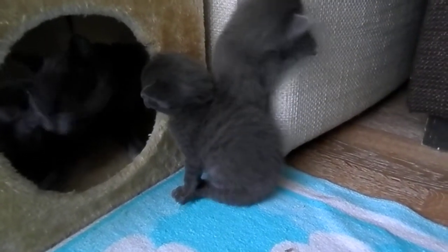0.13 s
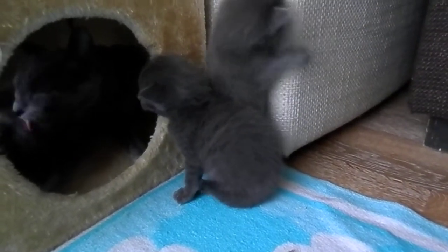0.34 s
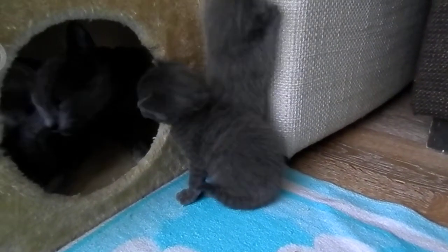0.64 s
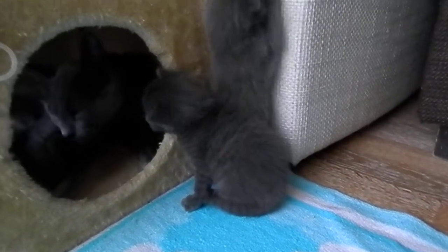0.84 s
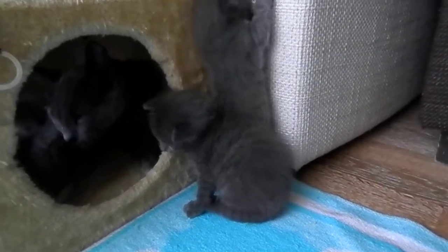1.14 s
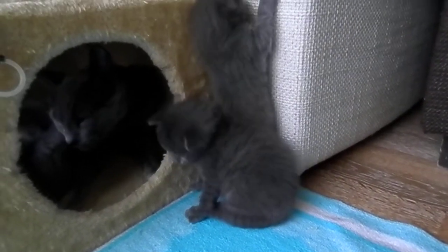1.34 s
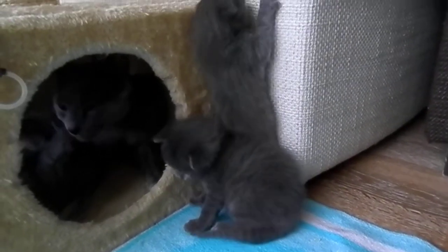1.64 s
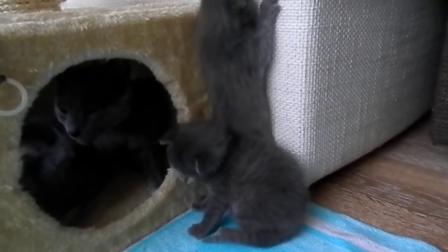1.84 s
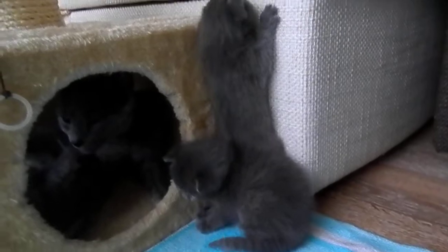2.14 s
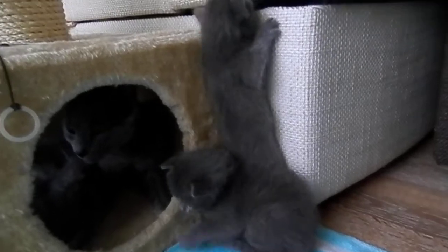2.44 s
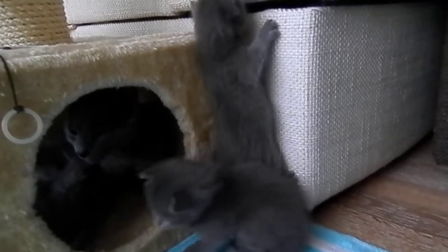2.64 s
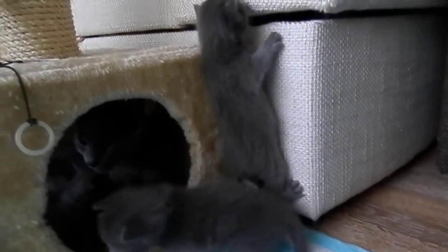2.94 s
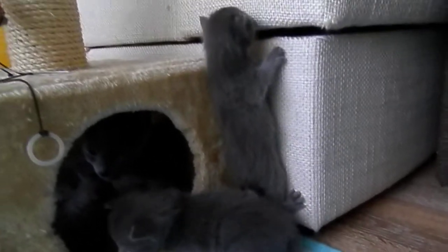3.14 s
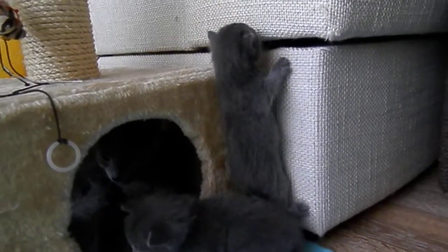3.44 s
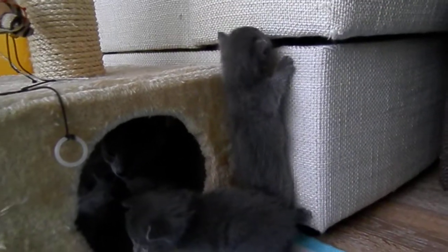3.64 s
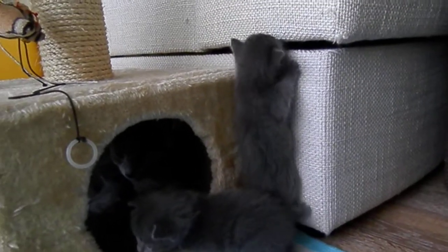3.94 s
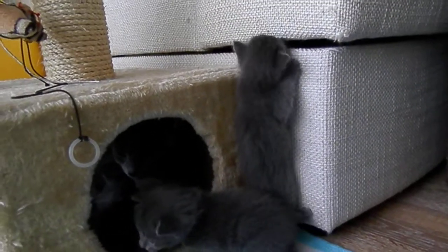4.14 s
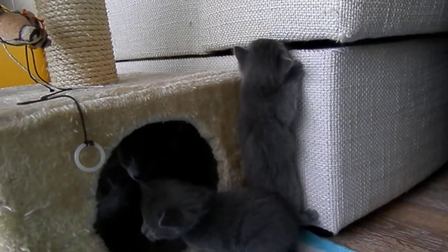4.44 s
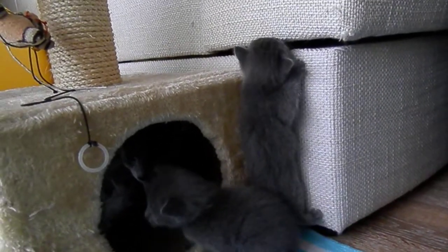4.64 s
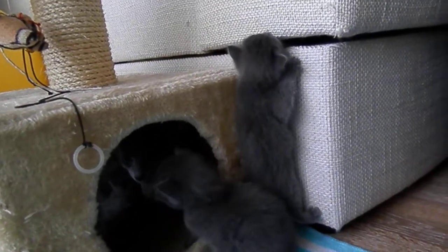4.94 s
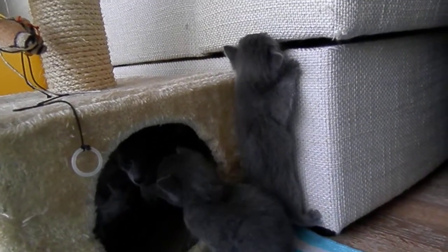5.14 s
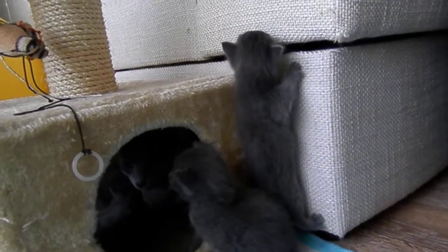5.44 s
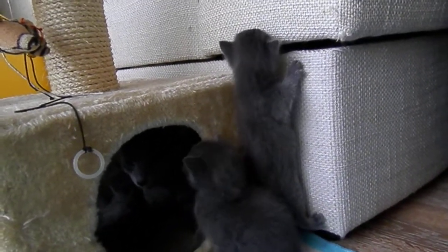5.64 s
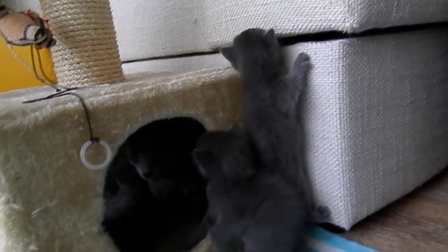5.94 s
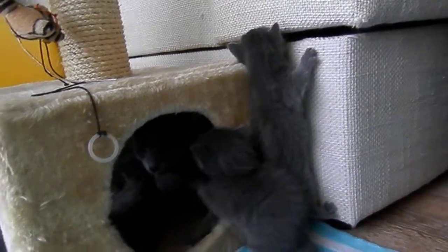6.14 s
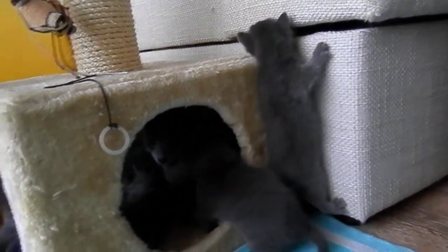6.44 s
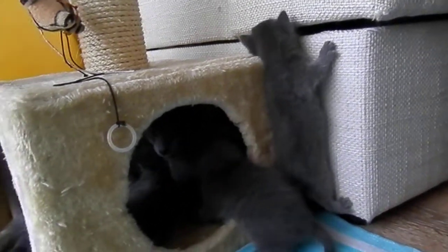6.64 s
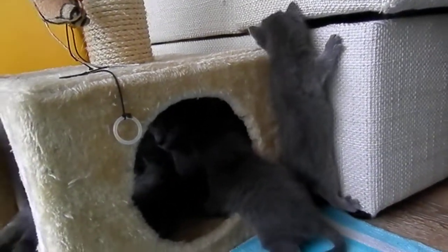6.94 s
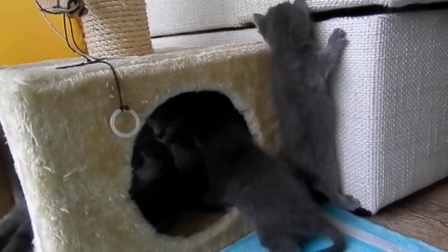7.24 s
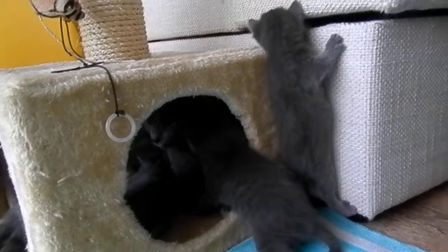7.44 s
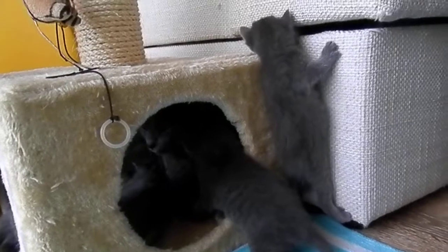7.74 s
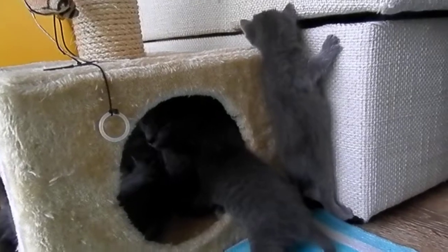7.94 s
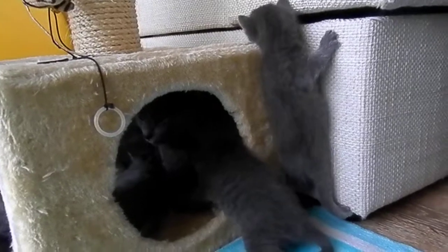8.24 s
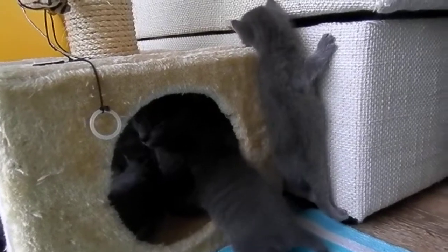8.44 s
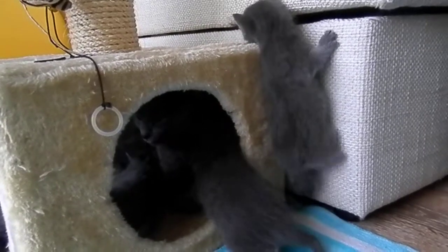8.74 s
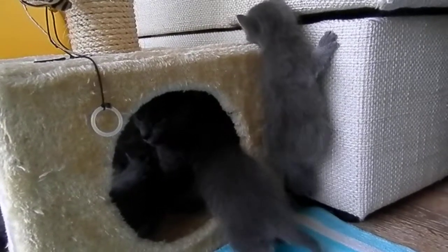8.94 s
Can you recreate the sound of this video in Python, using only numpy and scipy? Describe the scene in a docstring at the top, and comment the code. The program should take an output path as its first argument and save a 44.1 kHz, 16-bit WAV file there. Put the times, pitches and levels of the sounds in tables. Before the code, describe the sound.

Kitten claws tick and snap sparsely on woven sofa fabric, with soft paw bumps and hollow knocks, over a low, slowly rising machine hum.

```python
"""Quiet room: a kitten climbs the woven side of a sofa while another clambers into a plush cat house. Claws
snap threads (impulse with noise fray, band-passed) and drag over the weave (random fibre catches). Paws bump
the sofa's panel (decaying modes) and knock softly, as they land and in the house (short rings with scuffs).
Below: a slowly rising hum, like a far washing machine spinning up, faint fan tones, room rumble and hiss."""
import sys
import numpy as np
from scipy import signal
from scipy.fft import rfft, irfft
from scipy.io import wavfile
from scipy.ndimage import map_coordinates

SR = 44100
rng = np.random.default_rng(int(sys.argv[2]) if len(sys.argv) > 2 else 0)


def master(y):
    """Save y as 16-bit WAV."""
    cut = np.clip(np.atleast_2d(y).T, -1, 1)
    pcm = np.round(cut * 32767)  # scale
    wavfile.write(sys.argv[1], SR, pcm.astype(np.int16))


N = 401310
TIME_S = np.arange(N) / SR

# Claw lets go of a thread: t/s, thread level/dB, thread ring f/Hz, claw tick level/dB re thread,
# delay of slip off the next thread/s (1 ms or less: no separate slip)
THREAD_SNAPS = [(0.1336, -47.5, 3260, 0, 0.0071), (0.2818, -47.5, 3500, 2, 0), (0.3154, -49, 3170, -5, 0),
                (0.5064, -39, 2550, 4, 0), (0.7266, -42.5, 3180, -27, 0), (1.013, -53.5, 3240, 4.5, 0),
                (1.197, -37, 3140, -8, 0), (1.5138, -45, 2750, -3, 0), (1.6038, -47.5, 3150, -18, 0),
                (2.2795, -46, 2980, -6, 0.0072), (2.3582, -44.5, 3290, -7, 0.0019),
                (2.667, -45.5, 3030, -2.5, 0), (2.8293, -42, 2740, -19, 0), (2.851, -49, 3060, 1, 0.00096),
                (3.4221, -31, 3080, -1.5, 0.005), (3.436, -37.5, 3090, -4, 0.004),
                (3.7605, -46.5, 3020, -21, 0.0026), (3.9688, -49, 3360, -1, 0.0035),
                (4, -46, 3020, -3.5, 0.0013), (4.7491, -23, 3110, -7, 0.0055), (5.048, -45, 2820, -5, 0),
                (6.663, -48.5, 2520, 3.5, 0.0032), (6.6919, -35, 2470, -1, 0.0062),
                (6.7614, -48.5, 3100, 4, 0), (7.0291, -43.5, 2520, -1, 0.00084),
                (7.2793, -51.5, 2880, 1, 0), (7.9435, -35.5, 2700, -9.5, 0.0021),
                (7.976, -55, 2700, 2.5, 0), (8.1503, -50.5, 2760, -1.5, 0),
                (8.5913, -26.5, 3140, 0.5, 0.0038), (8.645, -26.5, 3500, 1, 0.0017)]
# Paw drags over cloth: t/s, length/s, thread level/dB, claw tick level/dB re thread
PAW_SCRAPES = [(0.028, 0.12, -63.5, 3.5), (0.127, 0.022, -54, 0), (0.727, 0.043, -58, -20),
               (0.877, 1.35, -64.5, -1.5), (1.454, 0.094, -67, 0), (2.002, 0.91, -67, -4),
               (2.268, 0.032, -51, -3.5), (2.347, 0.053, -56, -4), (2.458, 0.022, -54, -6),
               (3.434, 0.026, -50, -5), (3.738, 0.28, -62, -5.5), (3.936, 0.03, -56, -4),
               (4.632, 0.007, -40, -9), (4.744, 0.0056, -44, -16), (5.2, 0.051, -54.5, -9),
               (6.611, 0.19, -62.5, 3.5), (6.687, 0.018, -47.5, -1.5), (7.147, 0.081, -69, 6.5),
               (7.346, 0.18, -66.5, -1), (7.502, 0.079, -60.5, 1)]
# Paw lands on the sofa's side: t/s, thud level/dB, claw bite level/dB,
# cloth body level/dB re bite, fibre fizz level/dB re bite
PANEL_BUMPS = [(0.395, -33, -32, -10, -11), (0.4063, -32, -49.5, -3, 5), (0.5068, -38.5, -51.5, 7, -10),
               (4.634, -32, -33.5, 2, 0), (4.7175, -31.5, -43, 3.5, -4), (4.773, -32, -52, 10, 5),
               (6.335, -39.5, -58, 4, -6)]
# Modes of the upholstered panel: f/Hz, level/dB re thud, t60/s
PANEL_MODES = [(80, -28, 0.068), (126, -5.5, 0.13), (153, -4, 0.092), (299, -4, 0.046), (470, -7.5, 0.033),
               (1055, -5, 0.043)]
# Paw knocks or judders on a hollow board: t/s, length/s, ring level/dB, ring f/Hz
BOARD_KNOCKS = [(0.395, 0.005, -33.5, 560), (0.396, 0.005, -33.5, 1780), (4.6325, 0.005, -31, 1510),
                (5.202, 0.005, -42, 1420), (5.336, 0.005, -47, 1500), (5.401, 0.005, -46, 1500),
                (5.538, 0.005, -47, 1450), (6.005, 0.005, -49, 1500), (6.875, 0.005, -47, 640),
                (6.882, 0.048, -38.5, 317), (8.595, 0.005, -37, 1060), (8.891, 0.04, -34.5, 900),
                (9.061, 0.005, -40.5, 685)]
# Colour of echoes from furniture and walls: f/Hz, level/dB
ECHO_COLOUR = [(60, -13), (200, -11), (500, -0.5), (1100, -4.5), (1700, -5), (2200, -9), (2650, -9.5),
               (3100, -14), (4400, -21.5), (5200, -23), (7000, -28), (14000, -18)]
# Machine hum: t/s, level/dB rms
HUM_LEVELS = [(0, -59.5), (2.8, -64.5), (3.6, -54), (5.2, -52), (5.65, -46.5), (6.2, -49.5), (6.4, -43.5),
              (6.9, -41), (8.1, -41), (8.42, -46), (8.65, -43.5), (9.1, -47)]
# Fan tones: f/Hz, level/dB rms
FAN_TONES = [(200, -63.5), (220.5, -64.5)]
# Room rumble and hiss: f/Hz, level/dB per Hz
FLOOR_SPECTRUM = [(12, -82), (28, -83.5), (48, -81), (100, -78.5), (165, -78), (260, -82), (370, -85),
                  (520, -88.5), (900, -92), (2400, -94), (4000, -96.5), (7000, -98.5), (10000, -97.5),
                  (13000, -100.5), (16000, -100.3)]

MEDIUM_SNAP_DB = -46  # fizz and body offsets hold at this level
FIZZ_RE_TICK_DB, FIZZ_FALL_DB_PER_DB = 0.5, 0.5  # taut threads snap cleanly, with less fizz
BODY_RE_THREAD_DB, BODY_FALL_DB_PER_DB = -12, 0.3
SLIP_LOSS_DB = 6.5  # slip re the snap before it
RELEASE_TIME_S = (np.arange(1323) - 132) / SR  # release at 0
THREAD_HZ, THREAD_SCATTER = 2970, 0.08  # scatter: log-frequency spread
SMALL_SNAPS_PER_S, SMALL_SNAP_DB, SMALL_SNAP_SCATTER_DB, SMALL_TICK_RE_THREAD_DB = 6, -57, 1.5, -1
THUD_LAG_S = 0.0013  # claws touch before the pad
JUDDER_S, JUDDER_FADE_DB_PER_S = 0.0089, 90  # mean spacing of touches, their fading
KNOCK_CYCLES = 13  # ring cycles per 60 dB decay
ROOM_T60_S = 0.51
HUM_START_HZ, HUM_RISE_HZ_PER_S = 56.1, 1.71
NOTCH_HZ, NOTCH_WIDTH_HZ, HISS_DB, CUTOFF_HZ = 7825, 1080, -70.5, 15900


def from_db(db):
    """Decibels to amplitude ratio."""
    return 10 ** (np.asarray(db) / 20)


def rms_one(x):
    """Scale to unit rms."""
    return x / np.sqrt(np.mean(x ** 2) + 1e-20)


def band(x, low_hz, high_hz, order=2):
    """Causal Butterworth band-pass."""
    edges_hz = [low_hz, min(high_hz, .48 * SR)]
    return signal.sosfilt(signal.butter(order, edges_hz, "band", fs=SR, output="sos"), x + 1e-18)


def add(out, start_s, sound):
    """Mix a sound in from start_s on."""
    i = max(round(start_s * SR), 0)
    out[i:i + len(sound)] += sound[:max(N - i, 0)]


def coloured_noise(spectrum, size):
    """White noise of unit density shaped by (f/Hz, level/dB) points, interpolated over log frequency."""
    hz, db = np.transpose(spectrum)
    bins_hz = np.maximum(np.arange(size // 2 + 1) * SR / size, 1)
    gain = from_db(np.interp(np.log(bins_hz), np.log(hz), db))
    return irfft(rfft(rng.standard_normal(size)) * gain, size)


def drift(knots_per_s):
    """Smooth random curve of unit rms."""
    knots = rng.standard_normal(400)
    return rms_one(map_coordinates(knots, [TIME_S * knots_per_s], order=3, mode="wrap"))


def cloth(pull, ring_hz, claw_db, fizz_db, spread):
    """A pull rings the taut threads; the claw ticks above them and single fibres fizz on top."""
    spread = max(spread, 1.05)
    thread = band(band(pull, ring_hz / spread, ring_hz * spread), 1950, 4840, order=3)
    claw = band(pull, 4610, 7180, order=4)
    fizz = band(pull, 8600, 11930, order=3) + from_db(-12.5) * band(pull, 10200, 22000)
    return rms_one(thread) + from_db(claw_db) * rms_one(claw) + from_db(fizz_db) * rms_one(fizz)


def release(grain, level_db, ring_hz, claw_db, fizz_db, body_db, fray_db, fray_s=0.0018, spread=1.23,
            tension_db=-29, tension_s=0.001, tear_db=6, clean_above_db=-34, torn_below_db=-48):
    """The thread creaks as it tightens, lets go in one impulse, and frays for a few milliseconds."""
    t = RELEASE_TIME_S
    tightening = from_db(tension_db) * np.exp(-abs(t) / tension_s)
    fraying = from_db(fray_db) * np.exp(-abs(t) / fray_s)
    fibres = np.where(t < 0, tightening, fraying)
    slack = np.interp(level_db, [torn_below_db, clean_above_db], [1, 0])  # slack threads tear more
    pull = (t == 0) + from_db(tear_db * slack) * fibres * grain
    body = rms_one(band(pull, 1090, 1710) + from_db(-4.0) * band(pull, 370, 860))
    sound = cloth(pull, ring_hz, claw_db, fizz_db, spread) + from_db(body_db) * body
    return from_db(level_db) * sound / np.sqrt(10)  # rms over 30 ms to level of the loudest 3 ms


def small_snaps():
    """Snap rows for stray threads under a dragging paw: one at random per time slot, 8 at most."""
    starts_s, lengths_s = np.transpose(PAW_SCRAPES)[:2]
    chances = rng.standard_normal((len(PAW_SCRAPES), 8, 2))
    places = rng.random((len(PAW_SCRAPES), 8))
    rows = []
    for start_s, length_s, scatters, place in zip(starts_s, lengths_s, chances, places):
        delays_s = (np.arange(len(place)) + place) / SMALL_SNAPS_PER_S
        for delay_s, (size, pitch) in zip(delays_s, scatters):
            if delay_s < length_s:
                level_db = SMALL_SNAP_DB + SMALL_SNAP_SCATTER_DB * size
                ring_hz = THREAD_HZ * np.exp(THREAD_SCATTER * pitch)
                rows.append((start_s + delay_s, level_db, ring_hz, SMALL_TICK_RE_THREAD_DB, 0))
    return rows


def snaps(fray_db=-20, count=100):
    """One release, at times a weaker slip off the next thread; harder snaps have less fizz and body."""
    out = np.zeros(N)
    grains = rng.standard_normal((count, 2, len(RELEASE_TIME_S)))
    rows = THREAD_SNAPS + small_snaps()
    for (start_s, level_db, ring_hz, claw_db, slip_s), (grain, slip_grain) in zip(rows, grains):
        hardness_db = level_db - MEDIUM_SNAP_DB
        fizz_db = claw_db + FIZZ_RE_TICK_DB - FIZZ_FALL_DB_PER_DB * hardness_db
        body_db = BODY_RE_THREAD_DB - BODY_FALL_DB_PER_DB * hardness_db
        colour = (ring_hz, claw_db, fizz_db, body_db, fray_db)
        add(out, start_s + RELEASE_TIME_S[0], release(grain, level_db, *colour))
        if slip_s > 0.001:
            slip = release(slip_grain, level_db - SLIP_LOSS_DB, *colour)
            add(out, start_s + slip_s + RELEASE_TIME_S[0], slip)
    return out


def scrapes(catches_per_s=1100, size_db=4.5, rub_db=-11, spread=1.26, body_db=-11, fizz_re_tick_db=2):
    """A dragging paw catches on many tiny fibres at random, over the smooth rub of fur."""
    out = np.zeros(N)
    sizes = from_db(size_db * np.minimum(rng.exponential(1, N), 4))
    catches = sizes * rng.choice([-1, 1], N) * (rng.random(N) < catches_per_s / SR)
    pull = rng.standard_normal(N) * from_db(rub_db) + catches
    for start_s, length_s, level_db, claw_db in PAW_SCRAPES:
        stroke = pull[max(round(start_s * SR), 0):][:max(round(length_s * SR), 64)]
        weave = cloth(stroke, THREAD_HZ, claw_db, claw_db + fizz_re_tick_db, spread)
        body = from_db(body_db) * rms_one(band(stroke, 1000, 2750))
        add(out, start_s, from_db(level_db) * (weave + body) * signal.windows.tukey(len(stroke), .3))
    return out


def bumps(soft_db=-40, hard_db=-31, dull_hz=300, uneven_db=1.5):
    """Claws bite the weave, then the padded panel thuds; gentle bumps hardly reach its upper modes."""
    out = np.zeros(N)
    t = TIME_S[:SR // 5]
    hz, mode_db, t60_s = np.transpose(PANEL_MODES)
    rings = from_db(-60 * t / t60_s[:, None]) * np.sin(2 * np.pi * hz[:, None] * t)
    chances = rng.standard_normal((len(PANEL_BUMPS), len(PANEL_MODES)))
    grains = rng.standard_normal((len(PANEL_BUMPS), len(RELEASE_TIME_S)))
    for (start_s, thud_db, bite_db, body_db, fizz_db), chance, grain in zip(PANEL_BUMPS, chances, grains):
        softness = np.interp(thud_db, [soft_db, hard_db], [1, 0])
        dulling = 1 + softness * (hz / dull_hz) ** 2
        strengths = from_db(thud_db + mode_db + uneven_db * chance) / dulling
        bite = release(grain, bite_db, ring_hz=2910, claw_db=-12.5, fizz_db=fizz_db, body_db=body_db,
                       fray_db=-17, fray_s=0.0018, tension_db=-25)
        add(out, start_s + RELEASE_TIME_S[0], bite)
        add(out, start_s + THUD_LAG_S, strengths @ rings)
    return out


def knock(grain, peak_db, hz, contact_s=0.0009, scuff_db=-9, scuff_s=0.0058):
    """A paw scuffs the covering and starts one quickly dying ring in the board beneath."""
    t = TIME_S[:len(grain)]
    swell = (1 - np.exp(-t / contact_s)) * from_db(-60 * t * hz / KNOCK_CYCLES)
    ring = swell / swell.max() * np.sin(2 * np.pi * hz * t)
    scuff = from_db(scuff_db) * rms_one(band(grain, hz / 1.3, hz * 1.6)) * np.exp(-t / scuff_s)
    return from_db(peak_db) * (ring + scuff)


def knocks(pitch_scatter=0.12, time_scatter_s=0.00169, count=8):
    """A sliding paw judders in a fading run of knocks of varied pitch; a short touch knocks once."""
    out = np.zeros(N)
    chances = rng.standard_normal((len(BOARD_KNOCKS), count, 2))
    grains = rng.standard_normal((len(BOARD_KNOCKS), count, SR // 8))
    for (start_s, length_s, peak_db, hz), chance, run_grains in zip(BOARD_KNOCKS, chances, grains):
        delays_s = np.arange(0, length_s, JUDDER_S)
        for delay_s, (late, pitch), grain in zip(delays_s, chance, run_grains):
            touch_db = peak_db - JUDDER_FADE_DB_PER_S * delay_s
            touch = knock(grain, touch_db, hz * np.exp(pitch_scatter * pitch))
            add(out, start_s + delay_s + time_scatter_s * late, touch)
    return out


def room(x, first_echo_s=0.0016, near_db=2, near_s=0.015):
    """Near furniture scatters the sound at once; a dull, faint tail follows."""
    t = TIME_S[:SR // 2]
    tail = from_db(-60 * t / ROOM_T60_S)
    near = from_db(near_db) * np.exp(-t / near_s)
    decay = (tail + near) * (t > first_echo_s)
    echoes = coloured_noise(ECHO_COLOUR, len(t)) * decay / np.sqrt(np.sum(decay ** 2))
    return signal.fftconvolve(x, echoes)[:N]


def machines(waver_db=1.3, drum_db=-64, drum_waver_db=0.83, fan_waver_db=2.0):
    """A drum hums at twice its turning rate, with tabled room-resonance swells; fan tones waver slightly."""
    t_s, level_db = np.transpose(HUM_LEVELS)
    phase = 2 * np.pi * np.cumsum(HUM_START_HZ + HUM_RISE_HZ_PER_S * TIME_S) / SR
    hum = from_db(np.interp(TIME_S, t_s, level_db) + waver_db * drift(9)) * np.sin(phase)
    drum = from_db(drum_db + drum_waver_db * drift(3.8)) * np.sin(phase / 2)
    fan = np.zeros(N)
    for hz, db in FAN_TONES:
        fan_level = from_db(db + fan_waver_db * drift(4))
        fan += fan_level * np.sin(2 * np.pi * hz * TIME_S + 0.31 * drift(2.89))
    return np.sqrt(2) * (hum + drum + fan)  # rms to peak


def floor():
    """Steady noise, strongest in the bass."""
    return coloured_noise(FLOOR_SPECTRUM, N) * np.sqrt(SR / 2)  # density per Hz to full band


def scene(padded_room_db=-8):
    """Claws ring out into the room; padding swallows most of what the thuds send there."""
    claws = snaps() + scrapes()
    thuds = bumps() + knocks()
    echoes = room(claws + from_db(padded_room_db) * thuds)
    mono = claws + thuds + echoes + machines() + floor()
    return np.array([mono, mono])


def record(dry):
    """The microphone has a narrow treble notch, filled only by faint hiss; the top is cut."""
    edges_hz = [NOTCH_HZ - NOTCH_WIDTH_HZ / 2, NOTCH_HZ + NOTCH_WIDTH_HZ / 2]
    notched = signal.sosfilt(signal.butter(1, edges_hz, "bandstop", fs=SR, output="sos"), dry)
    hiss = from_db(HISS_DB) * rng.standard_normal(N)
    low_pass = signal.ellip(12, .1, 80, CUTOFF_HZ, fs=SR, output="sos")
    return signal.sosfilt(low_pass, notched + hiss)


dry = scene()
out = record(dry)
master(out)
```